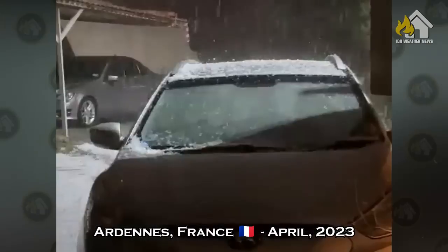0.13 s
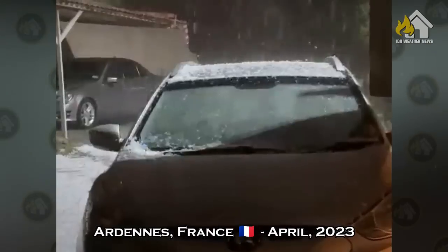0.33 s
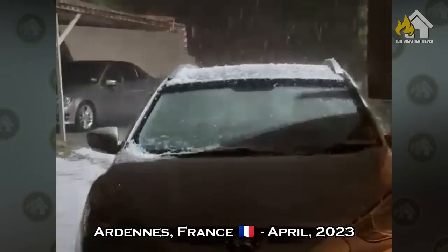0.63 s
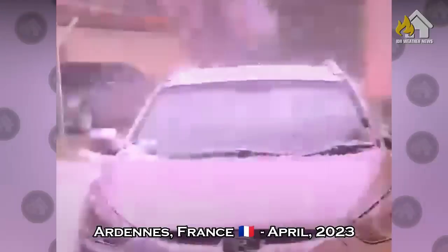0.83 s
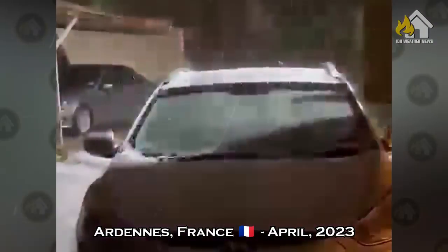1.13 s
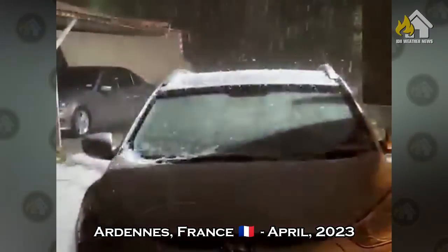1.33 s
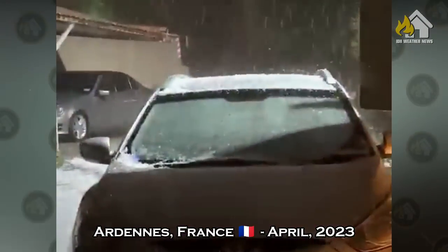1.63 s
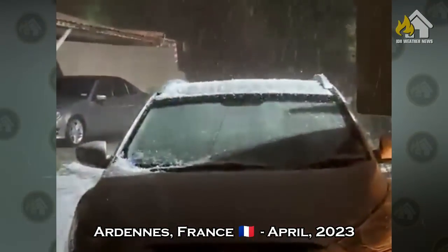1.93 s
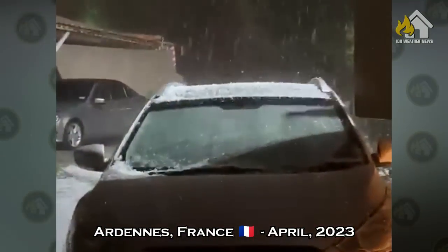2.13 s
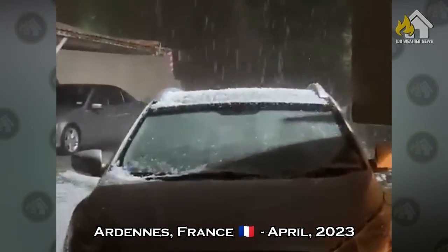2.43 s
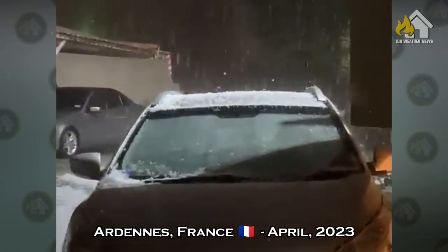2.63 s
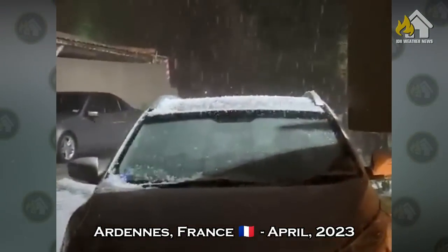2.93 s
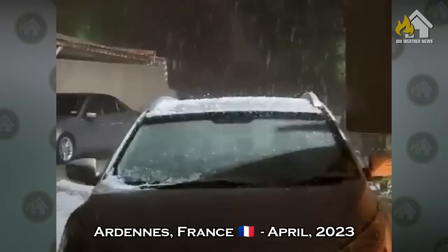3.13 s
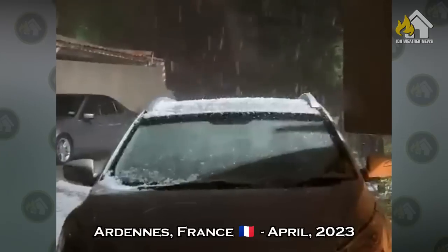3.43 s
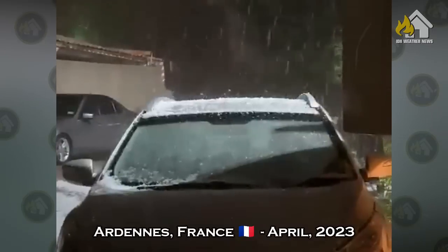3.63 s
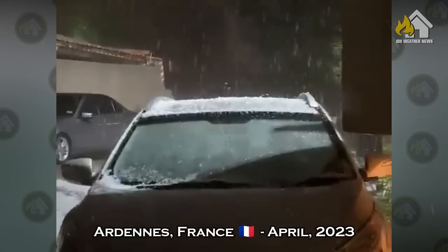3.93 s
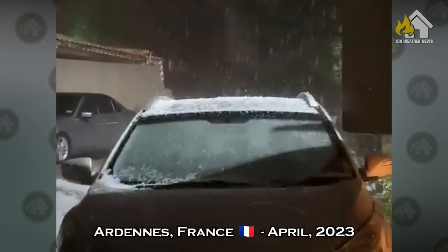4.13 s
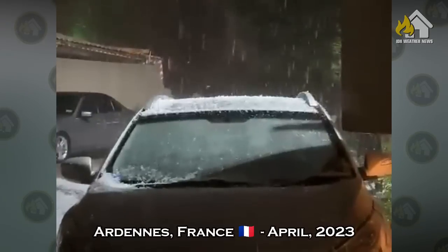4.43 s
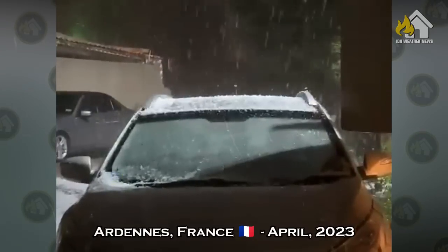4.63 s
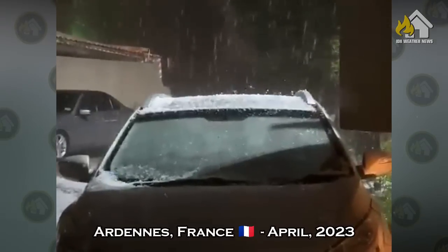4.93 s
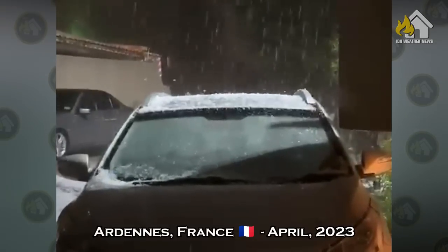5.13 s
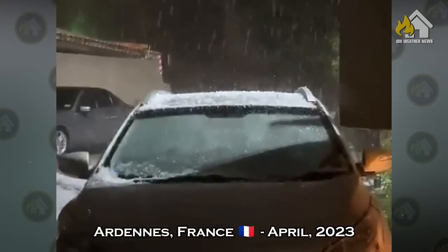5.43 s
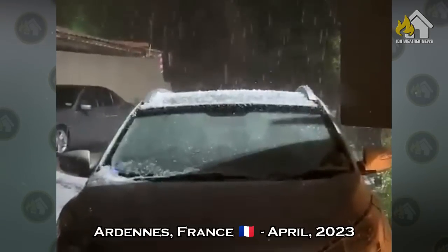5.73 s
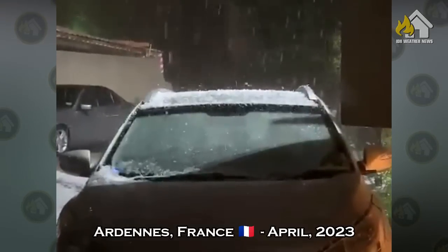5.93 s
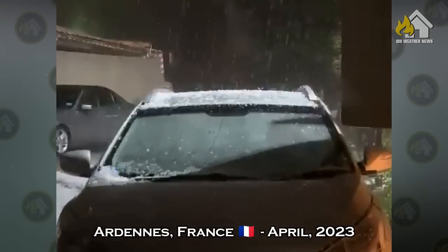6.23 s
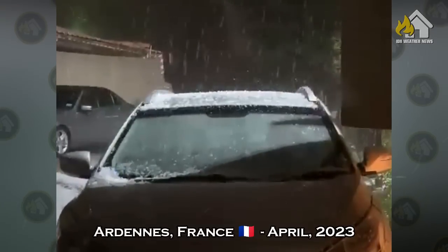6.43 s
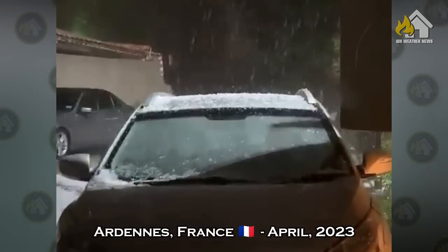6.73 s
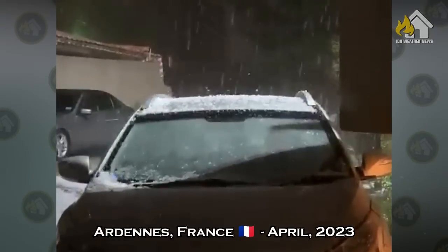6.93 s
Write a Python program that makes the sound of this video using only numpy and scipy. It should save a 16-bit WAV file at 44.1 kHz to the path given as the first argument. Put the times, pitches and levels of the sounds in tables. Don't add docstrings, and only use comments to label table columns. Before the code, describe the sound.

Steady heavy hailstorm beside a parked car, heard on a close phone microphone. A continuous mid-heavy rattle of countless small stones carries bright damped pings, glassy shattering ticks and hollow knocks on metal. It begins with a brief soft hail hiss and a tiny gap. Distant deep thunder rolls underneath, strongest around five seconds, fading at the end; the sound is slightly compressed and grainy.

```python
import sys
import numpy as np
from scipy import signal
from scipy.fft import rfft, irfft, next_fast_len
from scipy.io import wavfile
from scipy.ndimage import uniform_filter1d

SR = 44100
rng = np.random.default_rng(int(sys.argv[2]) if len(sys.argv) > 2 else 0)


def amplitude_ratio(level_db):
    exponent = np.asarray(level_db, float) / 20
    return 10 ** exponent


def int16_out(signal):
    q = np.round(np.clip(np.atleast_2d(signal).T, -1, 1) * 32767)
    wavfile.write(sys.argv[1], SR, q.astype(np.int16))


N = 313110

# (t/s, level/dB)
THUNDER_STRENGTH = [
    (0.19, -45),
    (3.06, -43.5),
    (4.89, -33.5),
    (4.91, -35),
    (5.17, -35),
    (5.41, -26),
    (5.43, -33),
    (5.67, -36.5),
    (6.15, -30.5),
    (7.1, -44),
]


def unit(x):
    return x / np.sqrt(np.mean(x ** 2) + 1e-20)


def along(points, hz, col=1):
    table = np.transpose(points)
    return np.interp(np.log(hz + 1), np.log(table[0] + 1), table[col])


def curves(rows):
    s, *cols = np.transpose(rows)
    return [np.interp(np.arange(N) / SR, s, c) for c in cols]


def slow(shape):
    return np.repeat(shape(np.arange(0, N, 64) / SR), 64, axis=-1)[..., :N]


def filtered(x, response):
    m = next_fast_len(N + 8192)
    return irfft(rfft(x, m) * response(np.fft.rfftfreq(m, 1 / SR)), m)[..., :N]


def stones(table, crack_db, ring_db, ring_t60, rise, smack_db=-4.5):
    smack_spread, smack_t60, crack_t60 = 0.45, 0.022, 0.059
    ring, crack = np.zeros((2, 2, N + SR))
    t = np.arange(SR // 20) / SR
    onset = 1 - np.exp(-(t / rise) ** 2)
    gains, ratios = [0.5, 0.91, 0.52, 0.3], [0.84, 1, 1.11, 1.5]
    for s, db, hz, top_db in table:
        here = slice(round(s * SR), round(s * SR) + len(t))
        phases = 2 * np.pi * rng.random((4, 2, 1))
        modes = sum(g * np.sin(2 * np.pi * hz * k * t + u) for g, k, u in zip(gains, ratios, phases))
        offset = np.linspace(-1.6, 1.6, 12)[:, None, None] + 0.1 * rng.standard_normal((12, 2, 1))
        wide = hz * np.exp(smack_spread * offset)
        cluster = np.sin(2 * np.pi * (wide * t + rng.random(wide.shape))).sum(0)
        smack = amplitude_ratio(smack_db - 60 * t / smack_t60) * cluster
        ring[:, here] += amplitude_ratio(db + ring_db) * onset * (amplitude_ratio(-60 * t / ring_t60) * modes + smack)
        burst = rng.standard_normal((2, len(t)))
        crack[:, here] += amplitude_ratio(top_db + crack_db - 60 * t / crack_t60) * onset * burst
    bright = lambda hz: 1 / (1 + (hz / 9500) ** 6) / (1 + (3000 / (hz + 1)) ** 3)
    return ring[:, :N] + filtered(crack[:, :N], bright)


def street():
    # (f/Hz, level/dB per Hz)
    street_tone = [(35, -39), (60, 5), (554, -1), (646, 1), (939, -7), (2370, -6), (3290, -15),
                   (11500, -33), (15000, -62), (22000, -120)]
    # (t/s, ring/dB, f/Hz, crack/dB)
    street_hits = [
        (0.023, -39, 2400, -49),
        (0.027, -58, 3630, -40),
        (0.045, -49, 2700, -49),
        (0.063, -34, 2750, -58),
    ]
    hiss = unit(filtered(rng.standard_normal((2, N)), lambda hz: amplitude_ratio(along(street_tone, hz))))
    hits = stones(street_hits, smack_db=-20, crack_db=1.5, ring_db=10.0, ring_t60=0.033, rise=0.0013)
    return amplitude_ratio(-40.5) * hiss + hits


def patchy(patchy_db, count=(6, 10)):
    z = signal.stft(rng.standard_normal((2, N)), nperseg=512)[2]
    field = uniform_filter1d(rng.standard_normal(z.shape[1:]), count[0], 0)
    field = uniform_filter1d(field, count[1], 1)
    return unit(signal.istft(z * amplitude_ratio(patchy_db * unit(field)), nperseg=512)[1][:, :N])


def shower(count, spread_db, t60):
    s, chance = rng.random((count, 2)).T
    size_db = np.minimum(-spread_db * np.log(1 - chance), 9)
    energy = np.bincount((s * N).astype(int), amplitude_ratio(2 * size_db), N)
    energy = signal.lfilter([1], [1, -amplitude_ratio(-120 / (t60 * SR))], energy)
    return np.sqrt(energy / energy.mean())


def pings(count, centre_hz, scatter, cycles, spread_db):
    s, size, turn, other = rng.random((count, 4)).T
    hz = centre_hz * np.exp(scatter * rng.standard_normal((count, 1)))
    t = np.arange(SR // 40) / SR
    size_db = np.minimum(-spread_db * np.log(1 - size), 9)
    fade = amplitude_ratio(size_db)[:, None] * np.exp(-t * hz / cycles) * (1 - np.exp(-t / 0.0018))
    at = ((s * N).astype(int)[:, None] + np.arange(len(t))).ravel()

    def one(phase):
        tones = fade * np.sin(2 * np.pi * (hz * t + phase[:, None]))
        return np.bincount(at, tones.ravel())[:N]

    return unit(np.array([one(turn), one(other)]))


def hail():
    # (t/s, level/dB)
    fall_level = [(0.19, -29.5), (0.25, -29.5), (0.36, -28), (0.42, -28.5), (1.48, -29.5), (1.82, -28.5),
                  (2.34, -29.5), (2.88, -28.5), (3.77, -30), (4.54, -28.5), (5.19, -29.5), (5.89, -30.5),
                  (6.12, -30.5), (7.1, -32)]
    # (f/Hz, level/dB per Hz)
    rattle_tone = [(120, -16.5), (200, -9), (281, -2.5), (356, -1), (491, -2.5), (634, -6), (804, -3),
                   (1250, -4.5), (2730, -7), (4850, -12), (6700, -11.5), (9250, -15.5), (11500, -30),
                   (15000, -53), (22000, -120)]
    # (t/s, swell/dB, length/s, share reaching the sheet-metal body)
    flurries = [(0.234, 3.5, 0.068, 1.4), (0.41, 0.5, 0.14, 0.51), (0.87, 3, 0.055, 0.55),
                (1.21, -1.5, 0.094, 0.66), (1.693, 2, 0.11, 0.81), (2.056, 2, .08, 0.94),
                (2.223, 1, .04, 0.9), (2.291, 5.5, .04, 0.72), (2.693, 0, .04, .3),
                (2.886, 1.5, 0.072, 2.2), (2.97, 2, 0.067, 1.9), (3.067, 1.5, 0.055, 2.5),
                (3.6, 2, 0.03, .6), (3.793, 0, .03, .6), (3.993, 1.5, 0.037, 0.65),
                (4.064, 1.5, 0.033, 0.35), (4.448, 0, .08, 2.4), (4.68, 1, 0.067, 1.4),
                (5.18, 3.5, 0.054, 0.31), (5.343, 2.5, 0.038, .6), (5.432, 3.5, .04, 1.4),
                (5.595, 1.5, .06, 0.36), (5.69, 5, 0.08, 0.27), (5.892, 1.5, 0.13, 2.9),
                (6.02, 1.5, .14, 2.9), (6.16, 1.5, 0.075, 3.3), (6.302, 2, 0.044, .4),
                (6.724, 2.5, 0.11, 0.36), (6.893, 4.5, 0.05, 1.7), (7.053, 5.5, 0.034, 0.25)]
    top_follows = 0.41
    body_per_thunder = 0.092

    level_db, = curves(fall_level)
    thunder_db, = curves(THUNDER_STRENGTH)
    flurry_db, drum_db = slow(lambda t: sum(
        db * np.outer([1, body], np.exp(-(2 * (t - s) / length) ** 2)) for s, db, length, body in flurries))

    crackle = shower(count=4000, spread_db=3, t60=0.01)
    clatter = shower(count=600, spread_db=1.0, t60=0.15)
    grain = np.sqrt(0.67 + 0.18 * crackle ** 2 + 0.14 * clatter ** 2)
    both = grain * patchy(patchy_db=1.5)
    both = unit(filtered(both, lambda hz: amplitude_ratio(along(rattle_tone, hz))))
    both = both + amplitude_ratio(-10.0) * pings(count=1500, centre_hz=800, scatter=0.453, cycles=5.2, spread_db=4.0)
    both = both + amplitude_ratio(-18.5) * pings(count=1500, centre_hz=2619, scatter=0.45, cycles=13.5, spread_db=10.0)

    top = filtered(both, lambda hz: 1 / (1 + (3800 / (hz + 1)) ** 4))
    body = filtered(both, lambda hz: 1 / (1 + (hz / 1000) ** 4))
    top_db = (top_follows - 1) * flurry_db + 0.5
    body_db = drum_db - flurry_db + body_per_thunder * (thunder_db - thunder_db.mean()) + 0.41
    both = both + (amplitude_ratio(top_db) - 1) * top + (amplitude_ratio(body_db) - 1) * body
    return amplitude_ratio(level_db + flurry_db + 3.5) * both


def near_stones():
    # (t/s, ring/dB, f/Hz, crack/dB)
    panel_hits = [(0.201, -16, 2830, -31), (0.258, -18, 3380, -26), (0.406, -15, 3600, -30),
                  (0.858, -16, 2350, -29), (1.402, -21, 2610, -37), (1.838, -17.5, 3090, -28),
                  (2.087, -17, 3600, -35), (2.667, -16, 1600, -27), (2.706, -13.5, 2950, -28),
                  (2.802, -18.5, 3100, -34), (3.299, -18, 1670, -31), (3.373, -19.5, 3350, -39),
                  (3.587, -20, 2700, -34), (3.797, -17, 2820, -43), (3.856, -17.5, 3480, -32),
                  (4.05, -15, 2320, -36), (4.241, -19.5, 3740, -40), (4.694, -16.5, 1534, -33),
                  (4.971, -15.5, 2910, -44), (5.114, -17, 2750, -25.5), (5.583, -20, 3390, -31),
                  (5.616, -16.5, 2140, -34), (5.701, -20, 2020, -42), (5.893, -22, 2000, -19),
                  (5.982, -18, 1600, -33), (6.472, -19, 3400, -35), (6.685, -18, 3430, -21.5),
                  (6.889, -27, 1970, -39), (7.029, -19, 3360, -38), (7.049, -19, 3620, -52)]
    # (t/s, crack/dB)
    shatters = [(.836, -25), (1.306, -28), (2.282, -26.5), (2.416, -26), (3.237, -25), (4.091, -26),
                (4.112, -27), (4.645, -29), (4.667, -26.5), (5.18, -31), (5.318, -25), (5.675, -29),
                (5.897, -22), (6.091, -29), (6.139, -29), (6.28, -25), (6.303, -27), (6.501, -27.5),
                (6.593, -26.5), (6.866, -34), (6.916, -25)]
    pane_hz, pane_ring_db = 2700, -5
    glass = [(s, db + pane_ring_db, pane_hz, db) for s, db in shatters]
    return stones(panel_hits + glass, crack_db=11, ring_db=-1.5, ring_t60=0.041, rise=0.0024)


def knocks():
    # (t/s, ring/dB, f/Hz)
    knock_hits = [(0.226, -23, 920), (0.28, -20.5, 1270), (0.395, -19, 800), (0.475, -33, 800),
                  (0.631, -21, 870), (0.836, -23, 827), (1.211, -17, 800), (1.682, -19, 840),
                  (2.039, -21.5, 1056), (2.384, -17, 878), (2.774, -17, 818), (3.076, -22, 800),
                  (3.284, -21.5, 812), (3.329, -17, 473), (3.798, -24, 1100), (3.861, -18, 503),
                  (4.333, -20.5, 610), (4.432, -21, 815), (4.45, -23, 550), (4.678, -22, 790),
                  (5.176, -26, 446), (5.417, -21.5, 980), (5.529, -18.5, 873), (5.613, -20.5, 823),
                  (5.893, -16, 1100), (5.97, -18, 542), (6.271, -22, 490), (6.472, -21, 450),
                  (6.721, -24, 1060), (6.886, -23, 970)]
    hits = [(s, db, hz, db) for s, db, hz in knock_hits]
    return stones(hits, crack_db=-9, ring_db=-2.5, ring_t60=0.12, rise=0.0019)


def thunder():
    # (f/Hz, level/dB per Hz)
    rumble_tone = [(13, -37), (22, -40), (49, 0), (92, 2.5), (120, -14), (160, -16), (260, -120)]
    # (f/Hz, level/dB per Hz)
    growl_tone = [(59, -41), (100, -6), (204, -1), (296, -3.5), (420, -9), (550, -42), (920, -120)]
    # (t/s, swell/dB, share in the deep register/0-1)
    low_surges = [(.25, 1, 0), (.74, 1, 0.7), (.92, 3.5, 0), (1.17, 5.5, 0.7), (1.63, 1, 0), (2.15, 2, 0.7),
                  (2.52, 6.5, .6), (3.27, 5, .8), (3.54, -0.5, .2), (3.63, 6, .8), (3.96, 2, .6), (4.19, 5, 1),
                  (4.48, 12.5, 0.56), (4.87, 5, .7), (5.13, 16, 0.43), (5.44, 6.5, 0.9), (5.56, 2, 1),
                  (5.87, 12, 0.55), (6.12, 7.5, 0.35), (6.48, 8.5, 0.17), (6.56, 5.5, 0.35), (6.93, 8.5, 0.45)]
    rise_s, fall_s = 0.03, 0.064
    growl_mean_db, growl_follows = -33.5, 0.32

    strength_db, = curves(THUNDER_STRENGTH)
    swell = lambda u: np.exp(np.where(u < 0, -(u / rise_s) ** 2, -abs(u) / fall_s))
    roll_db, growl_db = slow(lambda t: sum(
        db * 1.31 * np.outer([deep, 1 - deep], swell(t - s)) for s, db, deep in low_surges))
    roll, growl = [unit(filtered(rng.standard_normal(N), lambda hz: amplitude_ratio(along(tone, hz))))
                   for tone in (rumble_tone, growl_tone)]
    growl_db = growl_db + growl_mean_db + growl_follows * (strength_db - strength_db.mean())
    return amplitude_ratio(strength_db + roll_db - 2.5) * roll + amplitude_ratio(growl_db - 2.5) * growl


def starved(x, kept, fine, linger, own, drain=0):
    hop, lead = 1024, 1201
    thunder_peak_s = 5.15
    n, k = np.arange(2 * hop)[:, None], np.arange(hop)
    basis = np.cos(np.pi / hop * (n + 0.5 + hop / 2) * (k + 0.5)) * np.sqrt(2 / hop)
    basis = basis * signal.windows.kaiser_bessel_derived(2 * hop, 4 * np.pi)[:, None]
    at = np.arange(N // hop + 3)[:, None] * hop + n.T
    z = np.pad(x, (lead, 4 * hop))[at] @ basis
    hz = (k + 0.5) * SR / 2 / hop
    step = np.sqrt(abs(uniform_filter1d(z ** 2, size=32)) + 1e-20) / amplitude_ratio(along(fine, hz))
    edges, shares = np.transpose(kept)
    luck = rng.standard_normal(len(z)) + own * rng.standard_normal((len(kept), len(z)))
    budget = signal.lfilter([1], [1, -linger], luck)
    budget += drain * np.outer(edges > 10000, at[:, 0] > thunder_peak_s * SR)
    keep = np.argsort(np.argsort(budget)) / len(z) < shares[:, None]
    z = np.round(z / step) * step * keep[np.searchsorted(edges, hz, "right") - 1].T
    return np.bincount(at.ravel(), (z @ basis.T).ravel())[lead:lead + N]


def phone(mid, other):
    # (f/Hz, width/Hz, level/dB)
    humming_panels = [(149.6, 61, 6), (637.3, 12, 9.5), (790, 100, 1)]
    # (f/Hz, level/dB)
    side_level = [(150, -53), (330, -16), (550, -7), (1150, -9.5), (1500, -22.5), (4100, -7.5), (6300, -3),
                  (8000, 0), (11500, 6)]
    # (f/Hz, share/0-1, phase/rad)
    side_tied = [(310, 0.07, 3), (613, 0.5, 1.5), (1200, 0.6, 0.75), (1600, 0.1, 0.5), (6000, .05, -1.6),
                 (6440, .35, -1.5), (8200, .45, -1.6), (9800, .1, -1.5)]
    # (lower edge f/Hz, share/0-1)
    mid_kept = [(0, 1), (8270, .96), (8960, .84), (9650, .6), (10340, .34), (11020, .17), (11710, 0)]
    # (lower edge f/Hz, share/0-1)
    side_kept = [(0, .6), (340, 1), (1030, .92), (1200, .7), (1380, .04), (1550, 0), (4130, .5),
                 (4480, .62), (5170, .76), (5680, .62), (6200, .94), (6890, 1), (10340, .8), (11020, .6),
                 (11710, .07), (12050, 0)]
    # (f/Hz, band rms over rounding step/dB)
    mid_fine = [(150, 25), (800, 17), (1500, 12), (7000, 10.5), (9000, 5), (10300, 0), (11500, -3)]
    # (f/Hz, band rms over rounding step/dB)
    side_fine = [(150, -2), (500, 13), (850, 10), (1200, 3), (4500, 3), (6000, 6), (8500, 11), (10000, 6),
                 (11500, -3)]

    hum = lambda hz: amplitude_ratio(sum(db / (1 + (2 * (hz - c) / w) ** 2) for c, w, db in humming_panels))
    mid, other = filtered(np.array([mid, other]), hum)
    share = lambda hz: np.clip(along(side_tied, hz), 0, 1)
    tied = filtered(mid, lambda hz: share(hz) * np.exp(-1j * along(side_tied, hz, col=2)))
    free = filtered(other, lambda hz: np.sqrt(1 - share(hz) ** 2))
    side = filtered(tied + free, lambda hz: amplitude_ratio(along(side_level, hz)))
    side = starved(side, side_kept, side_fine, linger=0.45, own=0.6, drain=2.5)
    mid = starved(mid, mid_kept, mid_fine, linger=0.35, own=0.7, drain=0.5)
    return np.array([mid + side, mid - side])


def scene():
    street_end_s, car_start_s = 0.0745, 0.1815
    t = np.arange(N) / SR
    mid, other = hail() + knocks() + near_stones()
    car = phone(mid + thunder(), other)
    street_gate = np.clip((street_end_s - t) / 0.003, 0, 1)
    car_gate = np.clip((t - car_start_s) / 0.0012, 0, 1) ** 2
    return street() * street_gate + car * car_gate


def roll_off(x):
    return signal.sosfilt(signal.butter(12, 15500, fs=SR, output="sos"), x)


def record(dry):
    return roll_off(dry)


dry = scene()
out = record(dry)
int16_out(out)
```